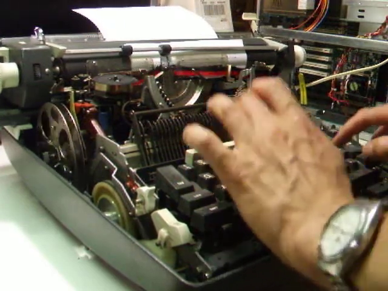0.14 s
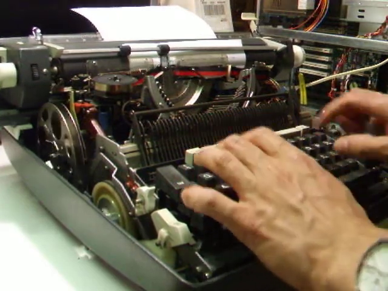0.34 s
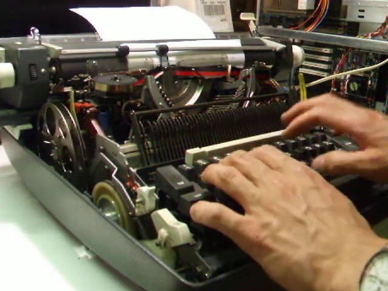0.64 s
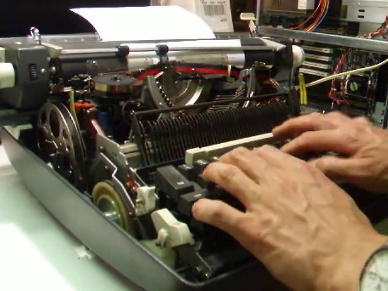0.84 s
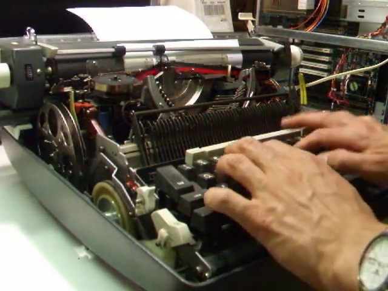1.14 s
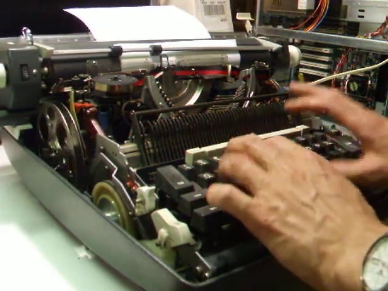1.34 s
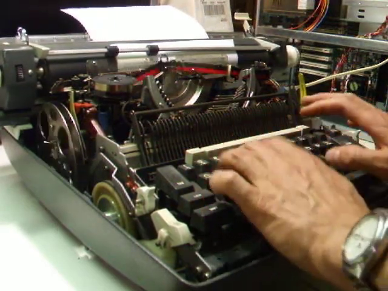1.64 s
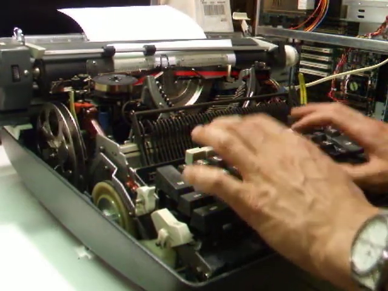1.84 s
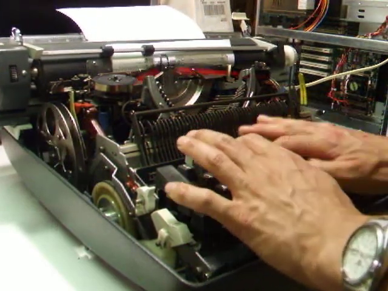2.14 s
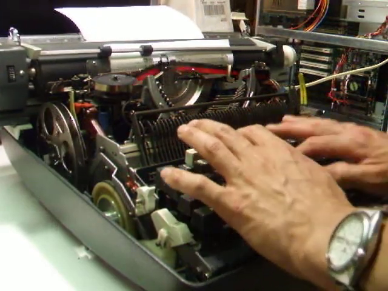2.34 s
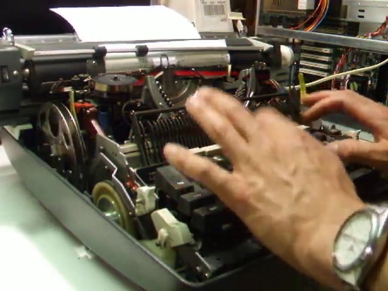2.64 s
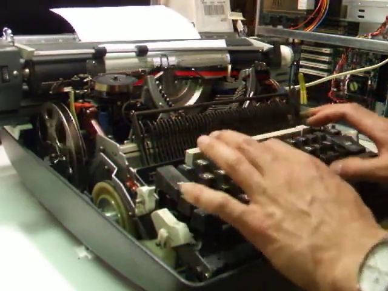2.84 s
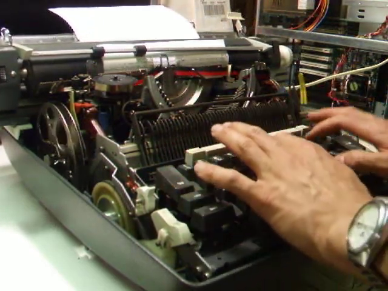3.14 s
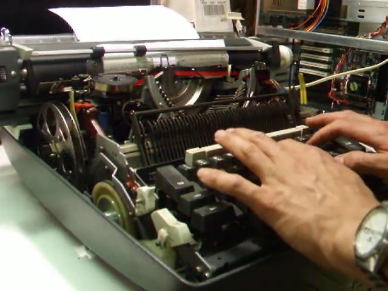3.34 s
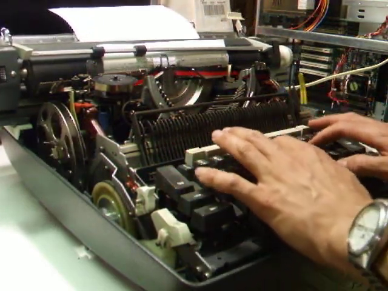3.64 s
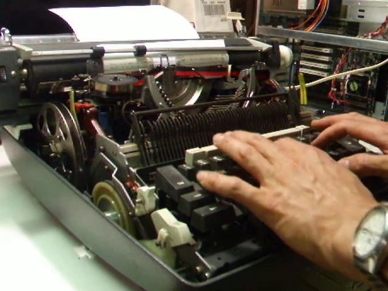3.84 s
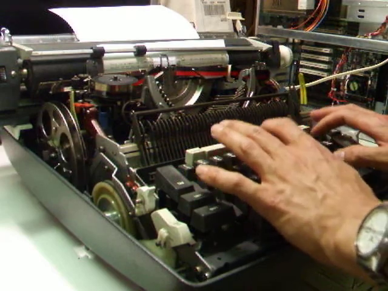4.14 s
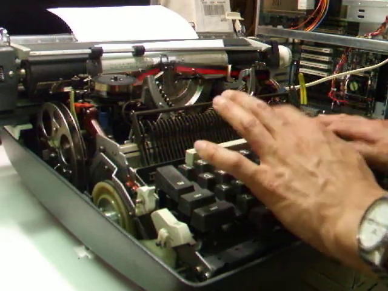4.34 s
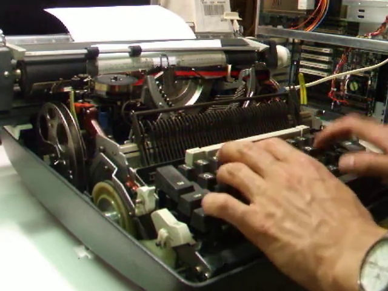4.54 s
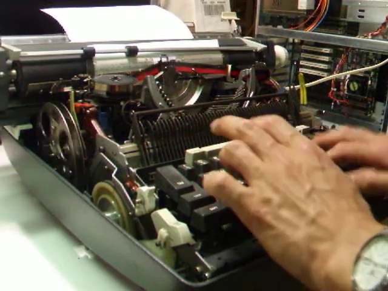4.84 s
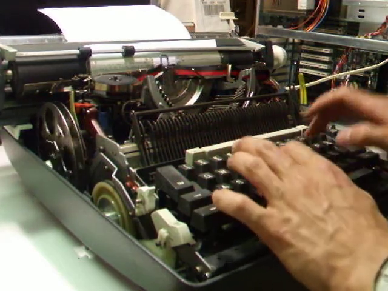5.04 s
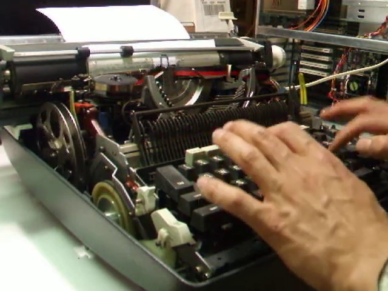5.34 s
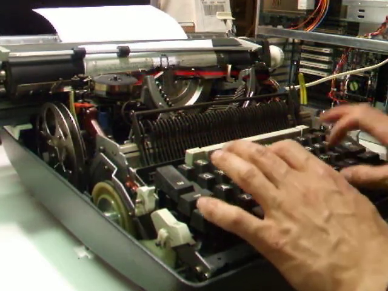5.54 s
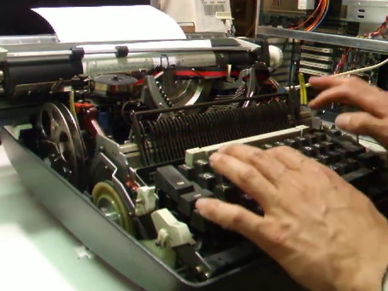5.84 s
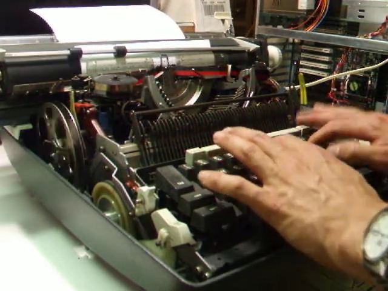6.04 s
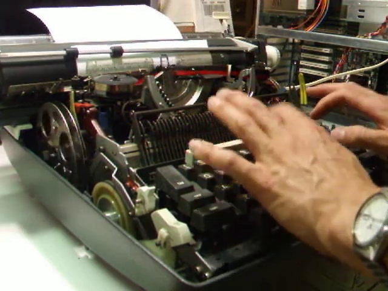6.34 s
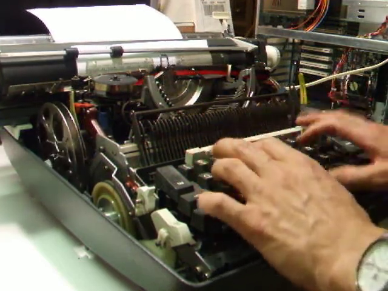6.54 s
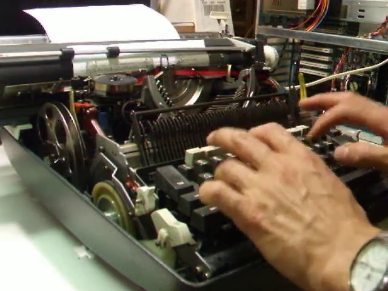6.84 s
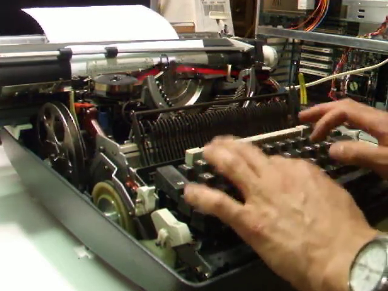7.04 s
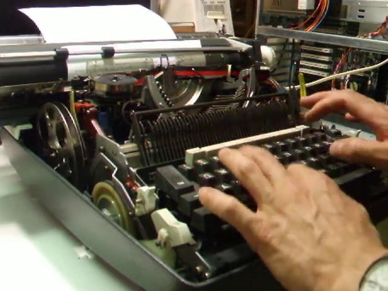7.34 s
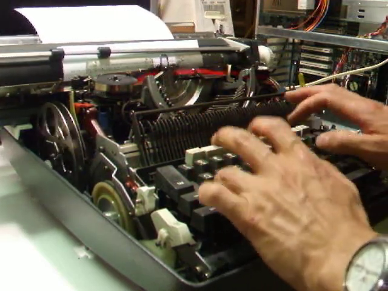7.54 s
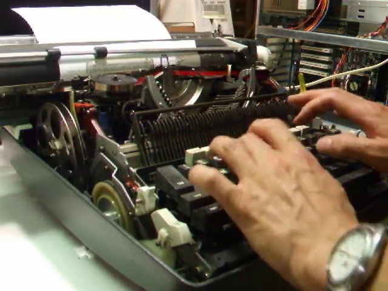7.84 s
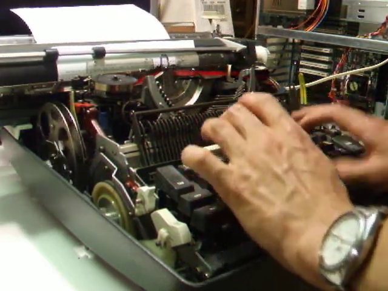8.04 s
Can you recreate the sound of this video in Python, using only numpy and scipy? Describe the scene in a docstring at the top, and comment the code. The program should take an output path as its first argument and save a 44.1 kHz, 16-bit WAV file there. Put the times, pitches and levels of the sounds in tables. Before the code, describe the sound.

Rapid typing on an open electric machine: crisp double clacks, rattling levers and soft desk thuds over continuous motor hum and hiss.

```python
"""Fast typing on an open electric typewriter

An electric typewriter without its cover is typed on fast, heard from close by in a small workshop.
Each key trips a latch: metal impacts ring the struck part and the bare frame. The drive whirs through
one cycle as loose parts tick and rub, and a hammer hits the platen and rebounds. Jolts make the desk
resonate, the motor hums, whines and ticks underneath, and a decaying noise tail gives the room.
The recorder turns its gain down while the typing is loud."""
import sys
import numpy as np
from scipy import signal
from scipy.fft import rfft, irfft, next_fast_len
from scipy.io import wavfile

SR = 44100
rng = np.random.default_rng(int(sys.argv[2]) if len(sys.argv) > 2 else 0)


def ratio(d):
    """dB to gain"""
    e = np.asarray(d, float) / 20
    return 10 ** e


def master(y):
    """Save y as 16-bit WAV."""
    cut = np.clip(np.atleast_2d(y).T, -1, 1)
    pcm = np.round(cut * 32767)  # scale
    wavfile.write(sys.argv[1], SR, pcm.astype(np.int16))


N = 361179

# Printing strokes: latch_s, latch_db, latch_ring_hz, wait_s until the hammer lands, hammer_db
PRINT_STROKES = [(0.021, -6.5, 6960, .0367, 0), (0.2199, -8, 6330, .0388, -5.5),
                 (0.8333, -7.5, 5420, .0443, 0.5), (0.9834, -2.5, 6520, 0.041, 1),
                 (1.1325, -4, 5780, .0445, -7), (1.4012, -5, 7346, .0406, -1),
                 (1.579, -17, 3950, .0365, -3.5), (1.63, -16, 6000, 0.04, -1.5),
                 (1.941, -1, 5990, .0459, -4.5), (2.144, -5.5, 6087, .0448, -3.5),
                 (2.3306, -7, 7960, .0404, 3), (2.4186, -14.5, 5830, .0355, 0.5),
                 (2.533, -15.5, 6300, .0375, 0), (4.24, -4.5, 6330, .0383, -5.5),
                 (4.3506, -21, 6360, .0342, -2.5), (4.5763, -4, 6450, .0378, -3),
                 (4.7151, -8, 5900, .0368, -1.5), (4.8278, -6.5, 6770, .0439, -5.5),
                 (4.9784, -5.5, 6740, .0454, -4), (5.1662, -2.5, 5850, .0446, -2.5),
                 (5.4168, -10.5, 6160, .0385, -10.5), (5.669, -5.5, 7350, .0387, -7.5),
                 (5.9323, -4.5, 5900, .041, -3), (6.0628, -7, 6170, .0403, 0),
                 (6.2248, -2.5, 6385, .0398, 3), (6.7687, -7, 7370, .037, 2), (6.9191, -7, 6630, .0429, 0),
                 (7.0163, -7.5, 6060, .0395, 2), (7.3711, -7, 6130, .0374, 2),
                 (7.4845, -9.5, 7330, .0373, 7.5), (7.634, -7.5, 4180, .0439, 3),
                 (7.7533, -12, 8080, .0359, 5), (7.904, -9, 5500, .0358, 5)]
# Cycles that print nothing, such as the space bar: first_pawl_s, pawl_db, whir_db
SPACE_STROKES = [(.424, -15, -32.5), (1.258, -13.5, -33.5), (1.777, -20.5, -32.5), (2.8936, -19, -33.5),
                 (4.412, -25, -31.5), (5.508, -18, -38), (6.557, -17, -31.5), (7.1711, -14, -40),
                 (8.0798, -19, -35.5)]
# Whir through a printing cycle (engage, wind up, slack after the blow, return, run out):
# time_s from the strike, level_db relative to the whir
PRINT_CYCLE = [(-.036, -51), (-.03, 2.5), (-.021, 1.5), (-.012, 6), (.004, 3.5), (0.014, -4), (0.038, 3.5),
               (.065, 2.5), (0.091, -7.5), (0.251, -63)]
# Whir through a space cycle: time_s from the first pawl, level_db relative to the whir
SPACE_CYCLE = [(0, -40), (.005, 2.5), (.018, -8.5), (.033, 3.5), (0.077, 6), (0.125, 4), (.149, -6.5),
               (.188, -28.5), (.288, -60)]
# Pawls of a space cycle: lag_s after the first, level_db relative to the pawl level, ring_hz, decay_s
PAWL_STEPS = [(0, -2, 4700, .006), (0.024, 2.5, 7444, 0.0093), (0.05, -1, 4350, .006)]
# Lone small ticks: start_s, peak_db, ring_hz
LONE_TICKS = [(0.177, -27, 4530), (1.749, -16, 4740), (3.9627, -26.5, 4934)]
# The place struck moves along the line, and its sound with it:
# time_s, platen_knock_db, carrier_ring_db, hammer_ring_hz
LINE_POSITION = [(0.1, -11, -24.5, 6360), (0.9, -11.5, -20, 6520), (1.601, -12.5, -15, 6100),
                 (2.4, -17, -9.5, 6570), (4.3, -18, -7.5, 6500), (5.2, -19, -9, 6500), (6.0, -15, -8, 6500),
                 (7.0, -11.5, -11.5, 6870), (7.9, -9, -22.5, 7360)]
# Resonances of the bare metal frame: pitch_hz, level_db (relative)
FRAME_MODES = [(1600, -21), (2700, -30.5), (3450, -20), (4270, 3.5), (4800, -15.5), (5400, 7), (5900, -2.5),
               (6420, 7), (6850, 14.5), (7250, 19), (7700, 8.5)]
# Resonances of the desk: pitch_hz, level_db (relative, for the drive rumble), t60_s
DESK_MODES = [(56, -8.5, 0.21), (117, 3.5, 0.094), (210.9, -3.5, 0.09), (319, -3.5, 0.069),
              (516, -7.5, 0.071)]
# Resonances rung by the hammer alone: pitch_hz, t60_s
PLATEN_MODE = (2130, .012)
CARRIER_MODE = (3480, .014)
# Resonances rung by the motor ticks: pitch_hz, t60_s
BEARING_MODES = [(4710, .02), (5200, .02), (5670, .015)]
# Three jolts of each cycle (hammer thrown, carrier stepping on, machine settling):
# lag_s from the strike, then peak_db at each desk mode
DESK_JOLTS = [(-.016, -60.5, -39.5, -40, -41.5, -47.5), (.055, -59, -37.5, -42.5, -47.5, -51.5),
              (.1, -41.5, -51.5, -53.5, -53.5, -56.5)]
# Colour of the whir: pitch_hz, level_db per Hz (relative)
CLATTER_SPECTRUM = [(88, -44.5), (150, -2), (352, -3.5), (708, -9), (978, -13.5), (2040, -7), (2540, -9.5),
                    (4240, -6), (7070, -4.5), (7960, -6), (8820, -16.5), (11500, -58), (19400, -120)]
# Mains, shaft and rotor-slot tones: pitch_hz, level_db (rms, about which each wavers)
HUM_TONES = [(59.8, -57), (120, -63), (178.6, -72), (206.6, -60), (240, -65), (357.1, -54), (387, -65),
             (413.5, -62), (714, -71), (7822, -76), (7852, -70), (7882, -70), (8118, -71), (8150, -72)]
# Narrow bands of motor noise: pitch_hz, width_hz, level_db (rms)
WHINE_BANDS = [(980, 70, -67), (3490, 46, -71)]
# Colour of the steady background noise: pitch_hz, level_db per Hz (relative)
AIR_SPECTRUM = [(20, -13), (90, -1), (250, 0), (420, -5.5), (560, -5.5), (700, -1), (1000, -3), (1600, -5),
                (3000, -8.5), (4800, -7.5), (6500, -9), (8200, -14.5), (9000, -20.5)]

AIR_DB, SHAFT_HZ = -48, 29.75   # noise rms; turns per second
FRAME_T60_S = .007
# levers clatter before the blow (S is the decay constant)
LEVER_LEAD_S, LEVER_DB, LEVER_HZ, LEVER_S, LEVER_SPREAD_DB = .014, -8.5, 6500, .018, 1
# a lever falls back after the blow
RETURN_LAG_S, RETURN_DB, RETURN_HZ, RETURN_S, RETURN_SPREAD_DB = .034, -16, 5500, .0039, 2
LEVER_PITCH_SPREAD = .13   # standard deviation of log pitch from stroke to stroke
REBOUND_DB, REBOUND_SPREAD_DB = -12.5, 4.5
LONE_TICK_S = .004   # decay constant
WHIR_DB, RUMBLE_DB, CYCLE_SPREAD_DB = -31, -44, .6
SPACE_RUMBLE_DB = -14   # relative to the whir of a space
JOLT_SPREAD_DB, JOLT_SPREAD_S = 2, .003
SPACE_STRIKE_S = .048   # where a space would have struck, after its first pawl
ROOM_T60_S, ROOM_DB = .22, -11


def rms_one(x):
    """Normalisation: scale to rms 1."""
    return x / np.sqrt(np.mean(x ** 2) + 1e-20)


def coloured(x, spectrum):
    """Linear filtering: shape by a spectrum drawn on a log-frequency axis."""
    hz, db = np.transpose(spectrum)
    size = next_fast_len(len(x))
    bins_hz = np.arange(size // 2 + 1) * SR / size
    gain = ratio(np.interp(np.log(bins_hz + 1), np.log(hz), db))
    return irfft(rfft(x, size) * gain, size)[:len(x)]


def ring(clicks, hz, t60):
    """Damped resonance: a unit click sets a sine of height 1 ringing."""
    radius = ratio(-60 / (t60 * SR))
    angle = 2 * np.pi * hz / SR
    poles = [1, -2 * radius * np.cos(angle), radius ** 2]
    return signal.lfilter([0, np.sin(angle)], poles, clicks + 1e-18)


def drift(rate_hz):
    """Low-passed noise: slow chance with spread 1."""
    pole = np.exp(-2 * np.pi * rate_hz / SR)
    noise = rng.standard_normal(N + SR)
    return rms_one(signal.lfilter([1], [1, -2 * pole, pole ** 2], noise)[SR:])


def add(out, start_s, sound):
    """Superposition: mix a short sound in at its start."""
    i = round(start_s * SR)
    out[i:i + len(sound)] += sound[:N - i]


def motor():
    """Periodic excitation: wavering tones, narrow whines and uneven ticks at thirds of a turn, over noise."""
    t = np.arange(N) / SR
    hum = np.zeros(N)
    for hz, db in HUM_TONES:
        level = np.sqrt(2) * ratio(db + 2.2 * drift(5))
        hum += level * np.sin(2 * np.pi * (hz * t + rng.random()))
    whine = np.zeros(N)
    for hz, width_hz, db in WHINE_BANDS:
        t60 = np.log(1000) / np.pi / width_hz
        whine += ratio(db) * rms_one(ring(rng.standard_normal(N), hz, t60))
    thirds = np.diff(np.floor(3 * SHAFT_HZ * t), prepend=0) > 0
    ticks = thirds * ratio(rng.normal(-52, 4, N) + 2.5 * drift(8))
    ticking = sum(ring(ticks, hz, t60) for hz, t60 in BEARING_MODES)
    air = ratio(AIR_DB) * rms_one(coloured(rng.standard_normal(N), AIR_SPECTRUM))
    return hum + whine + ticking + air


def contact(peak_db, hz, rise, length, ring_db, frame_db, spread_db, rough):
    """Impact excitation: a burst of micro-impacts gives a broad crack and rings the part and the frame."""
    t = np.arange(2500) / SR
    impacts = rng.standard_normal(len(t)) * np.exp(rough * rng.standard_normal(len(t)))
    push = impacts * (1 - np.exp(-t / rise)) * np.exp(-t / length) + 1e-15
    frame = np.zeros(len(t))
    for k, (mode_hz, db) in enumerate(FRAME_MODES):
        sign = (-1) ** k
        frame += sign * ratio(db + rng.normal(0, spread_db)) * ring(push, mode_hz, FRAME_T60_S)
    crack = signal.sosfilt(signal.butter(1, [2800, 8500], "band", fs=SR, output="sos"), push)
    crack, part, frame = (p / np.abs(p).max() for p in (crack, ring(push, hz, FRAME_T60_S), frame))
    sound = crack + ratio(ring_db) * part + ratio(frame_db) * frame
    return ratio(peak_db) * sound / np.abs(sound).max()


def latch(out, key_s, db, hz):
    """Impact of a tripped latch, then the longer rattle it releases."""
    add(out, key_s + .0004, contact(db, hz, .0006, .0008, 4, -5, 4, .2))
    add(out, key_s + .002, contact(db - 8, hz, .001, .007, -8, -6, 4, .5))


def hammer(out, strike_s, peak_db):
    """Impact and rebound: blow, chatter and second contact, with platen and carrier resonances."""
    line_s, *columns = np.transpose(LINE_POSITION)
    platen_db, carrier_db, hz = (np.interp(strike_s, line_s, c) for c in columns)
    add(out, strike_s + .0004, contact(peak_db, hz, .0001, .00015, -5, -5, 4, .2))
    add(out, strike_s + .0018, contact(peak_db - 8, hz, .0002, .0004, -5, -3, 2.5, .3))
    rebound_db = rng.normal(REBOUND_DB, REBOUND_SPREAD_DB)
    add(out, strike_s + .0074, contact(rebound_db, 6800, .0003, .0004, 4, -9, 2.5, .2))
    click = np.eye(1, 1000)[0]
    for (knock_hz, t60), db in ((PLATEN_MODE, platen_db), (CARRIER_MODE, carrier_db)):
        pitch_hz = knock_hz * rng.normal(1, .023)   # differs a little from blow to blow
        add(out, strike_s + .0005, ratio(db) * ring(click, pitch_hz, t60))


def levers(strike_s):
    """Impacts either side of the blow: lever clatter and fall-back, as (start_s, peak_db, ring_hz, decay_s)."""
    clatter_db = rng.normal(LEVER_DB, LEVER_SPREAD_DB)
    clatter_hz = LEVER_HZ * np.exp(rng.normal(0, LEVER_PITCH_SPREAD))
    return_db = rng.normal(RETURN_DB, RETURN_SPREAD_DB)
    return_hz = RETURN_HZ * np.exp(rng.normal(0, LEVER_PITCH_SPREAD))
    return [(strike_s - LEVER_LEAD_S, clatter_db, clatter_hz, LEVER_S),
            (strike_s + RETURN_LAG_S, return_db, return_hz, RETURN_S)]


def contacts():
    """Superposed impacts of latches, hammers, levers, pawls and lone ticks, with weak bass radiation."""
    out, small = np.zeros(N), []
    for key_s, latch_db, latch_hz, wait_s, hammer_db in PRINT_STROKES:
        latch(out, key_s, latch_db, latch_hz)
        hammer(out, key_s + wait_s, hammer_db)
        small += levers(key_s + wait_s)
    for start_s, pawl_db, _ in SPACE_STROKES:
        small += [(start_s + lag_s, pawl_db + db, hz, decay_s) for lag_s, db, hz, decay_s in PAWL_STEPS]
    small += [(*tick, LONE_TICK_S) for tick in LONE_TICKS]
    for start_s, peak_db, hz, decay_s in small:
        add(out, start_s, contact(peak_db, hz, rise=.0023, length=decay_s, ring_db=-5,
                                  frame_db=-15, spread_db=4, rough=.59))
    # small parts radiate little bass
    return signal.sosfilt(signal.butter(2, 1200, "high", fs=SR, output="sos"), out)


def rattle(per_s, size_db, cycles):
    """Random impacts in clumps: loose parts tick, each ringing a few cycles at one of twenty pitches."""
    sizes = ratio(size_db * np.minimum(rng.exponential(1, N), 4)) * rng.choice([-1, 1], N)
    happens = rng.random(N) < per_s * ratio(5 * drift(50)) / SR
    ticks = sizes * happens
    dealt = rng.integers(0, 20, N)
    pitches = np.geomspace(900, 8200, 20)
    return rms_one(sum(ring(ticks * (dealt == k), hz, cycles / hz) for k, hz in enumerate(pitches)))


def drive():
    """Amplitude-modulated noise: each cycle shakes loose parts that tick and rub, and rumbles the desk."""
    t, whir_power, rumble_power = np.arange(N) / SR, np.zeros(N), np.zeros(N)
    cycles = []
    for key_s, _, _, wait_s, _ in PRINT_STROKES:
        whir_db, rumble_db = rng.normal([WHIR_DB, RUMBLE_DB], CYCLE_SPREAD_DB)
        cycles.append((key_s + wait_s, whir_db, rumble_db, PRINT_CYCLE))
    cycles += [(s, db, db + SPACE_RUMBLE_DB, SPACE_CYCLE) for s, _, db in SPACE_STROKES]
    for start_s, whir_db, rumble_db, shape in cycles:
        shape_s, shape_db = np.transpose(shape)
        power = ratio(2 * np.interp(t - start_s, shape_s, shape_db, left=-200, right=-200))
        whir_power += power * ratio(2 * whir_db)
        rumble_power += power * ratio(2 * rumble_db)
    ticks = rattle(per_s=2500, size_db=2, cycles=18.4)
    ticks = rms_one(signal.lfilter([1, -.8], [1], ticks))   # small parts radiate mostly treble
    rubbing = rng.standard_normal(N) * ratio(3.6 * drift(46))
    clatter = rms_one(coloured(ticks + ratio(-1) * rubbing, CLATTER_SPECTRUM))
    pushes = np.sqrt(rumble_power) * rng.standard_normal((len(DESK_MODES), N)) / 30
    rumble = sum(ratio(db) * ring(push, hz, t60) for push, (hz, db, t60) in zip(pushes, DESK_MODES))
    return np.sqrt(whir_power) * clatter + rumble


def thumps():
    """Modal excitation: soft jolts near set points of every cycle ring the desk."""
    strikes = [r[0] + r[3] for r in PRINT_STROKES] + [r[0] + SPACE_STRIKE_S for r in SPACE_STROKES]
    pushes = np.zeros((len(DESK_MODES), N + SR))   # spare second for jolts past the end
    for strike_s in strikes:
        for lag_s, *levels_db in DESK_JOLTS:
            at = int((strike_s + rng.normal(lag_s, JOLT_SPREAD_S)) * SR)
            pushes[:, at] += ratio(rng.normal(levels_db, JOLT_SPREAD_DB))
    sound = sum(ring(push[:N], hz, t60) for push, (hz, _, t60) in zip(pushes, DESK_MODES))
    return signal.sosfilt(signal.butter(2, 700, fs=SR, output="sos"), sound)


def room(x):
    """Diffuse reverberation: a dying, dulled noise tail stands for the many close reflections."""
    t = np.arange(SR // 2) / SR
    tail = rng.standard_normal(len(t)) * ratio(-60 * t / ROOM_T60_S) * (t > .004)
    tail = signal.lfilter([1], [1, -.3], tail)
    return signal.fftconvolve(x, tail / np.sqrt(np.sum(tail ** 2)))[:N]


def scene():
    """Superposition: typing with its reflections over the motor."""
    typing = contacts() + drive() + thumps()
    return (typing + ratio(ROOM_DB) * room(typing) + motor())[None]


def low_pass(x):
    """Removes everything above the highest recorded frequency."""
    return signal.sosfilt(signal.butter(12, 8970, fs=SR, output="sos"), x)


def record(dry):
    """Level compression and band limiting: slow gain control, a steep treble cut and clipped peaks."""
    keep = np.exp(-1 / (.36 * SR))   # the power average forgets over 0.36 s
    power = signal.lfilter([1 - keep], [1, -keep], dry ** 2, zi=[[1e-3]])[0]
    over_db = np.maximum(10 * np.log10(np.abs(power) + 1e-12) + 45, 0)   # above -45 dB
    levelled = dry * ratio(-.21 * over_db)
    dulled = signal.sosfilt(signal.butter(20, 8236, fs=SR, output="sos"), levelled)
    return low_pass(np.clip(dulled, -.76, .72))


dry = scene()
out = record(dry)
master(out)
```